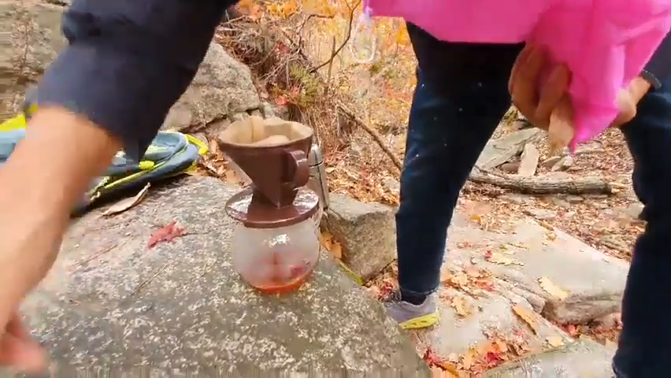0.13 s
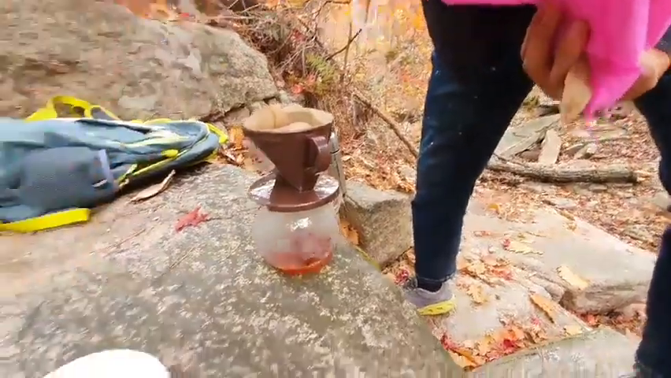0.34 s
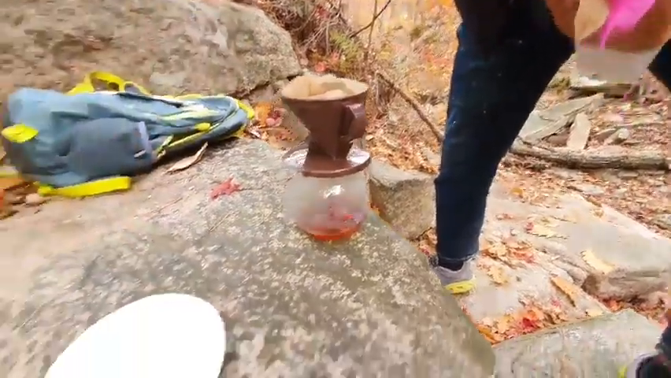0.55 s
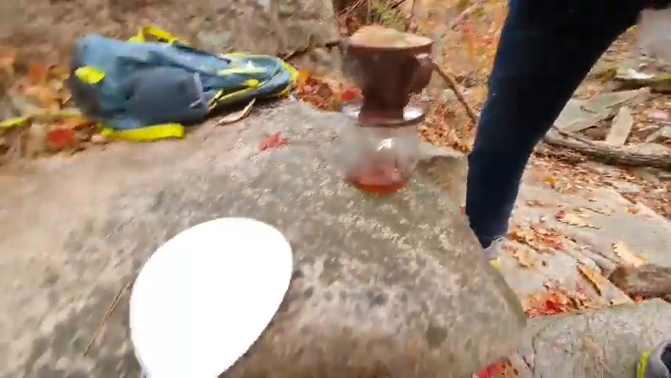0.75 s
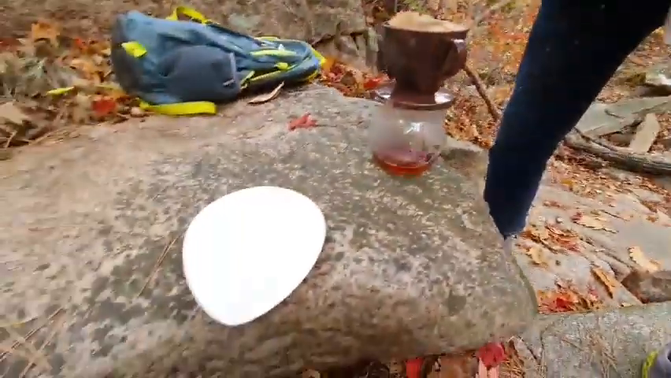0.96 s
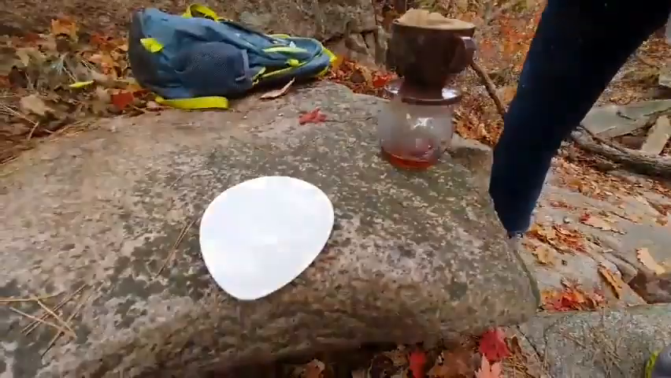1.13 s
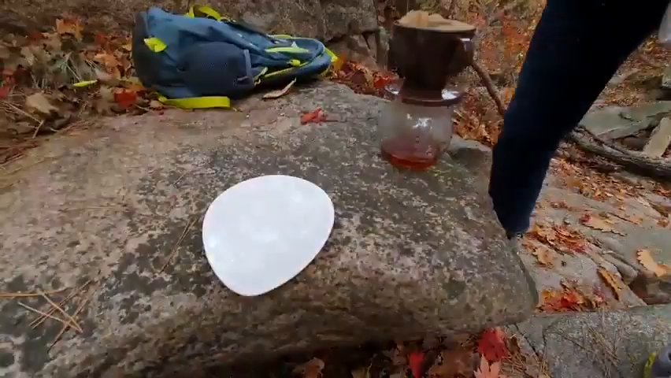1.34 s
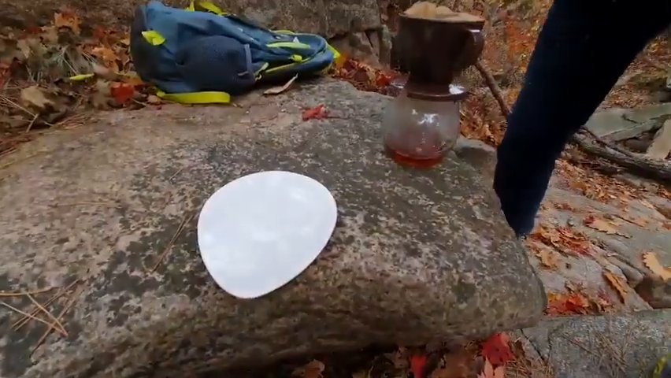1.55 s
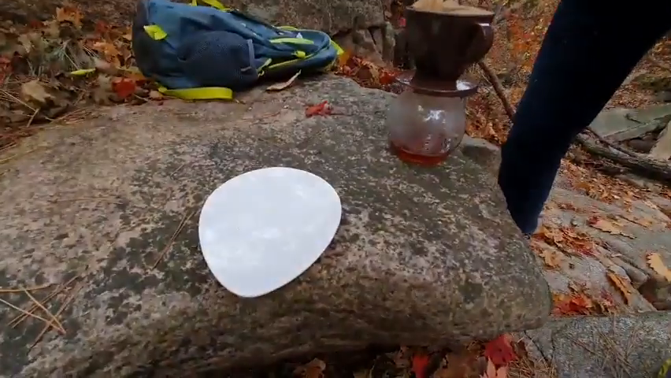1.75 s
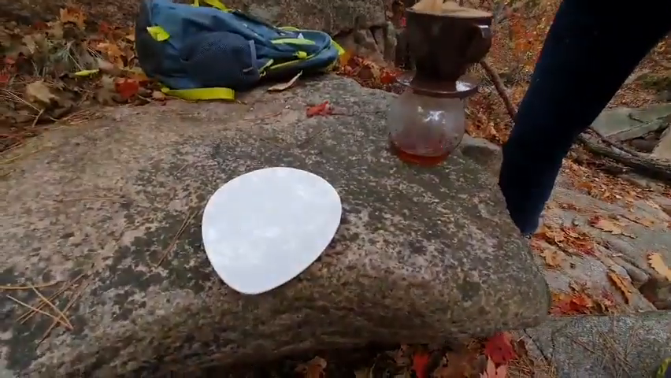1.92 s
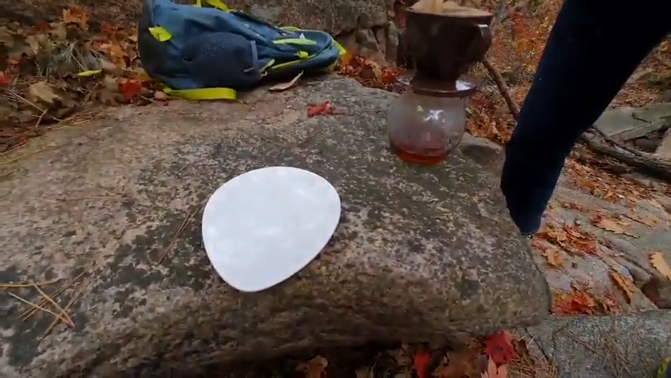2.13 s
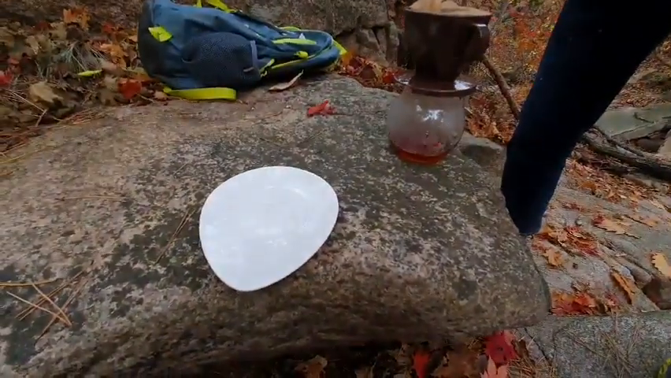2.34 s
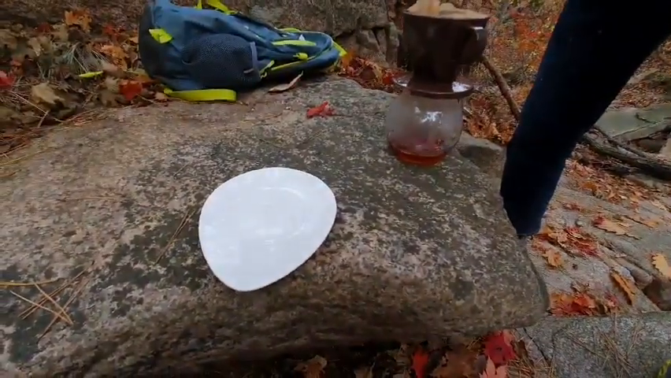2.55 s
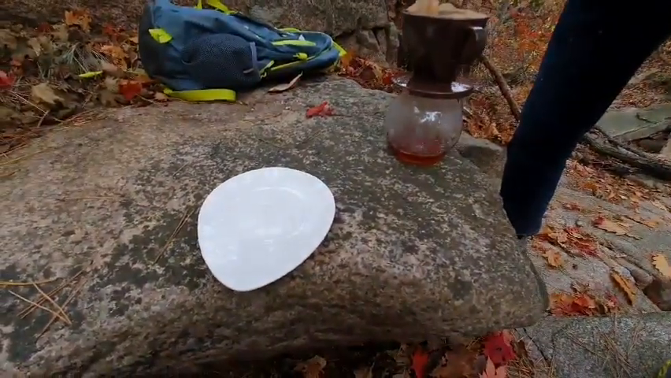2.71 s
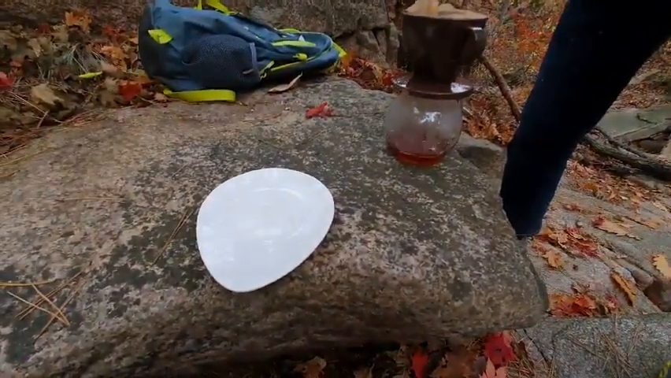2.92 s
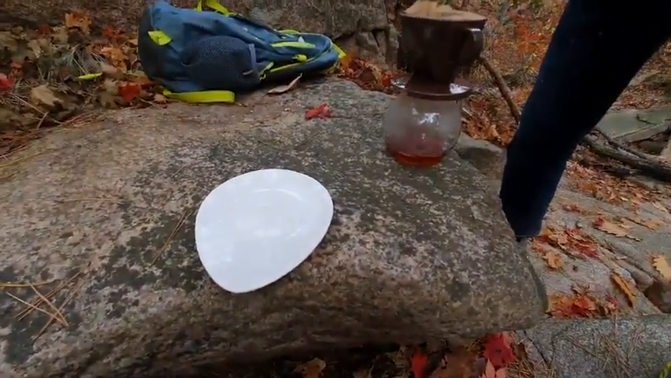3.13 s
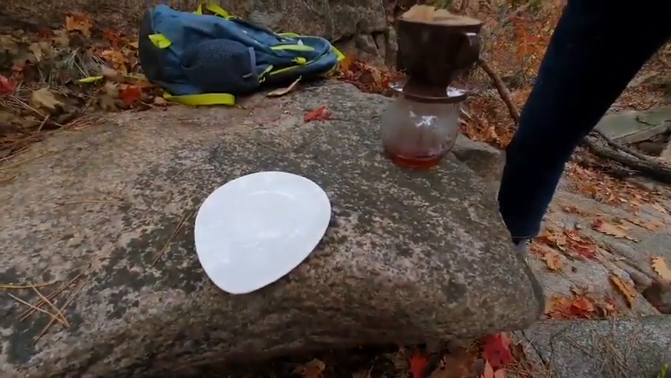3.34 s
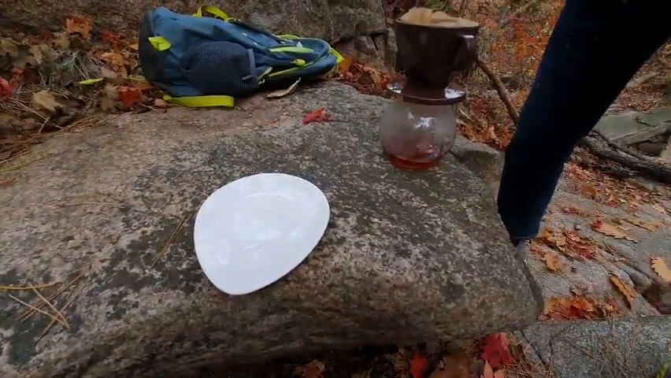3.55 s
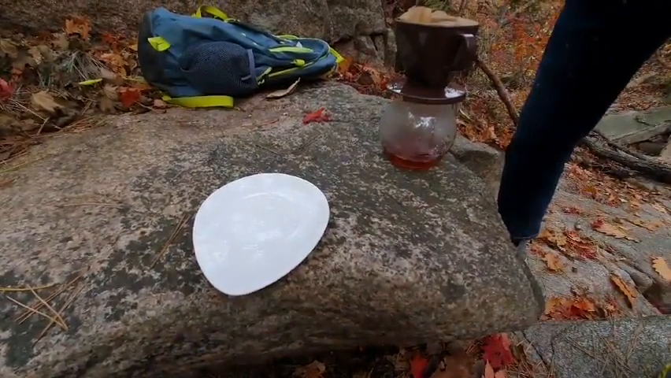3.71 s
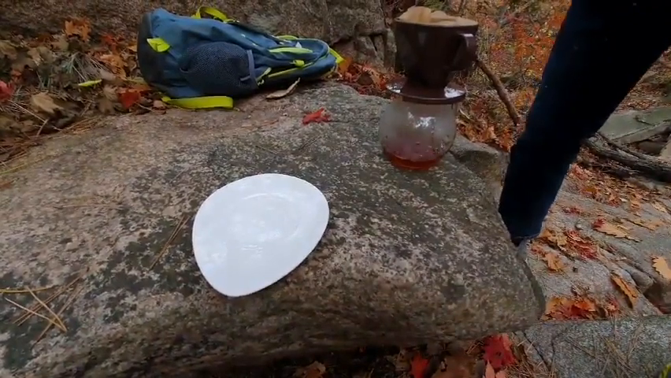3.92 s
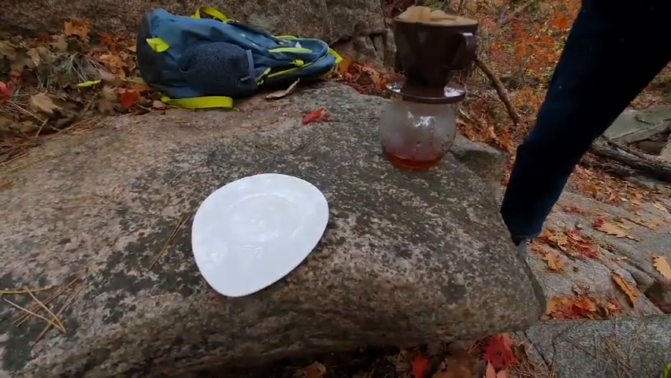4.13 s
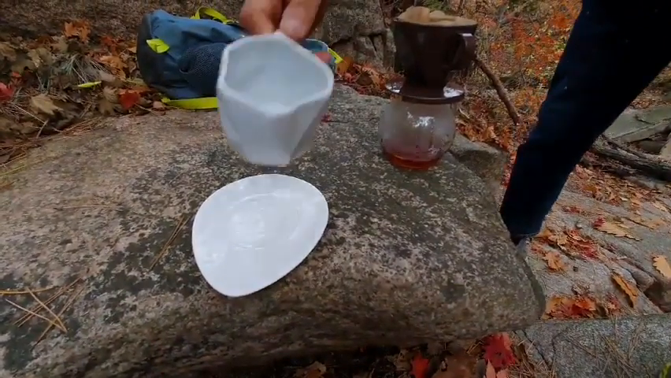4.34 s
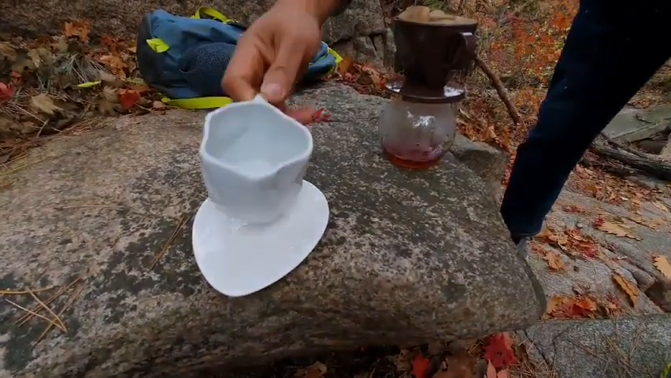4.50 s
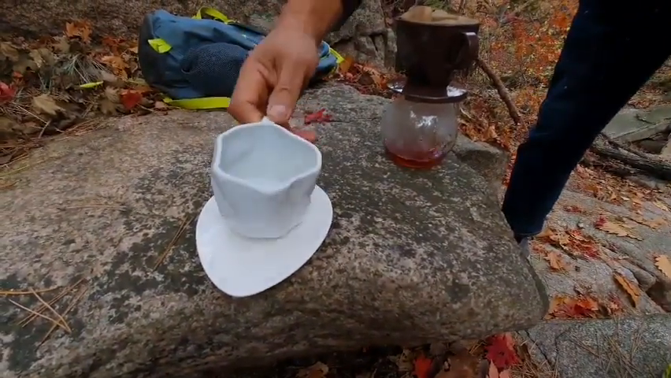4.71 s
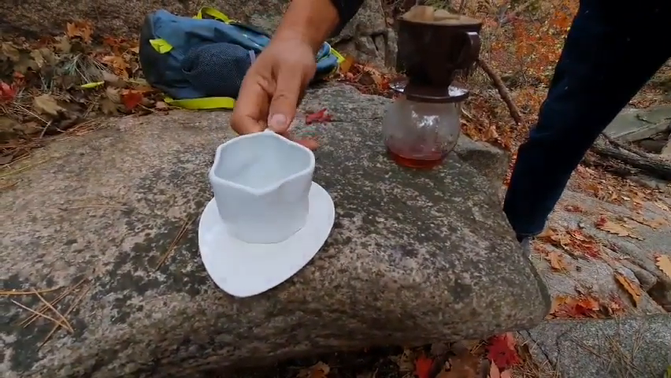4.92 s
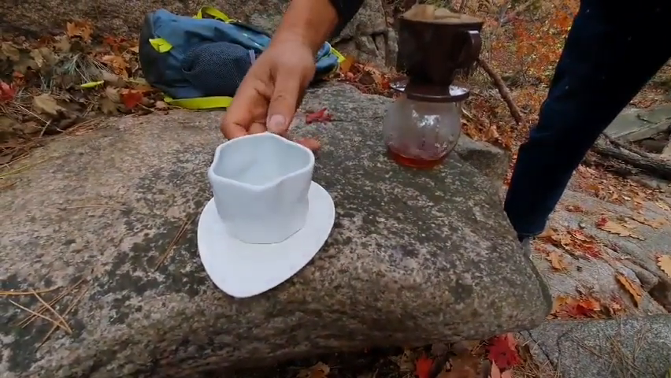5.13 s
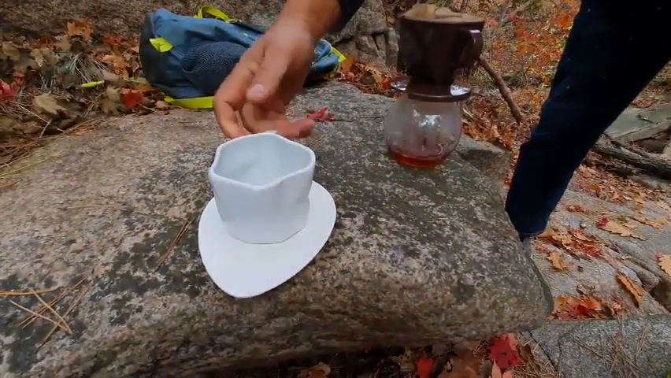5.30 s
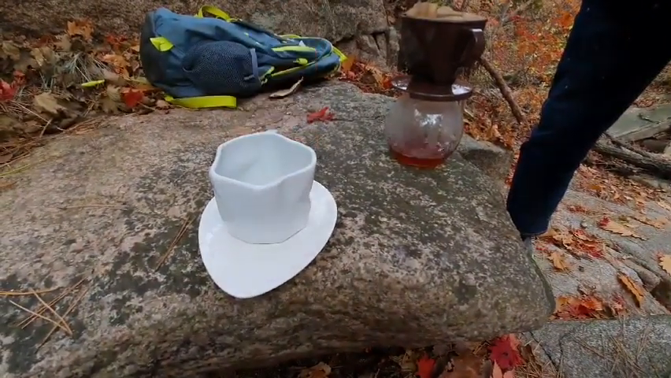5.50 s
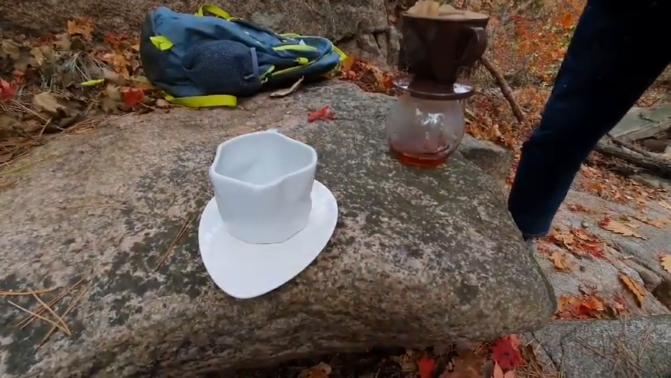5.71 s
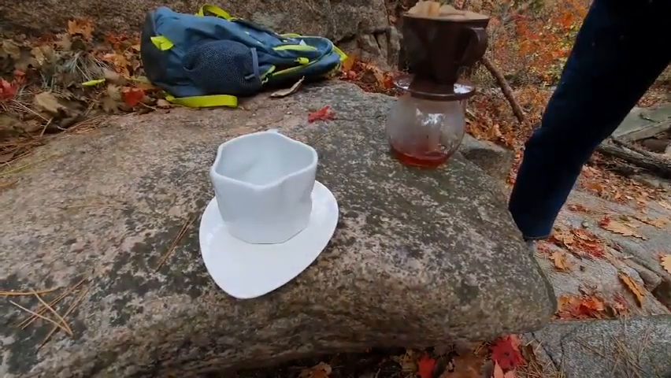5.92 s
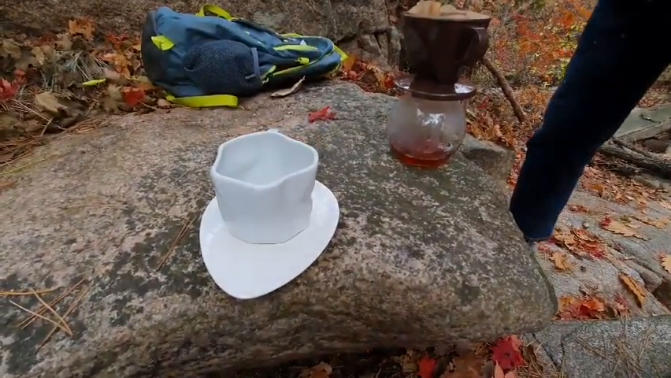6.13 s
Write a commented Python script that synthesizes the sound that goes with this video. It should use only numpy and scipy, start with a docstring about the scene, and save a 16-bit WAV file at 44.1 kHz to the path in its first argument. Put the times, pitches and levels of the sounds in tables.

```python
"""A porcelain saucer grinds to rest on a boulder in a quiet valley and rings out as the fingers let go.
A jacket sleeve swishes, porcelain is rubbed in short strokes close by, and then a cup is set on
the saucer: a gritty slide and a few clinks until its foot sits flat.
Porcelain is rough contact force driving decaying modes, plus coloured grit; cloth, snaps, valley air
and puffs at the microphone are shaped noise, with a faint falling zip in the cloth."""
import sys
import numpy as np
from scipy import signal
from scipy.fft import rfft, irfft
from scipy.io import wavfile

SR = 44100
rng = np.random.default_rng(int(sys.argv[2]) if len(sys.argv) > 2 else 0)


def inscribe(sig):
    """Save sig as 16-bit PCM at rate SR to the path in sys.argv[1].

    A 1-D sig is mono; a 2-D sig holds one channel per row.
    Samples are clipped to [-1, 1] before scaling.
    """
    pcm = np.round(np.clip(np.atleast_2d(sig).T, -1, 1) * 32767)
    wavfile.write(sys.argv[1], SR, pcm.astype(np.int16))


N = 276066
T = np.arange(N) / SR  # seconds


def from_db(db):
    """Amplitude gain of a level in dB."""
    return 10 ** (np.asarray(db) / 20)


def rms_one(x):
    """Scale to an rms of 1."""
    return x / np.sqrt(np.mean(x ** 2) + 1e-20)


def in_time(rows):
    """Each column of a curve, sample by sample."""
    s, *columns = np.transpose(rows)
    return [np.interp(T, s, column) for column in columns]


def at_hz(points, hz):
    """Read a spectrum on a log-frequency axis."""
    f, value = np.transpose(points)
    return np.interp(np.log(hz + 1), np.log(f), value)


def panned(pan_db):
    """Left and right gains of constant power; positive leans left."""
    return rms_one(from_db([[pan_db / 2], [-pan_db / 2]]))


def coloured(x, spectrum):
    """Causal (minimum-phase) filter of unit power gain, made by folding the cepstrum."""
    size = 4096
    gain = rms_one(from_db(at_hz(spectrum, np.fft.rfftfreq(size, 1 / SR))))
    cepstrum = irfft(np.log(gain))
    cepstrum[1:size // 2] *= 2
    cepstrum[size // 2 + 1:] = 0
    impulse = irfft(np.exp(rfft(cepstrum)))
    return signal.oaconvolve(np.atleast_2d(x), impulse[None], axes=1)[:, :N]


def grains(spread_db, per_s):
    """Noise of rms 1 whose strength varies from one asperity to the next."""
    sizes = from_db(spread_db * np.clip(rng.standard_normal(N), -2, 2))
    return rms_one(rng.standard_normal(N) * np.interp(T * per_s, np.arange(N), sizes))


# How alike the two microphone sides are. Each row: frequency in Hz, left-right likeness from -1 to 1.
LIKENESS = [(50, -0), (300, 0.7), (640, 0.4), (1400, -0.2), (3100, -0.4), (7000, -0.3), (15000, 0.3)]


def diffuse(spectrum, spread_db, per_s):
    """Grainy sound of rms 1 from all around; left-right likeness varies with frequency."""
    mid, side = rfft(grains(spread_db, per_s)), rfft(grains(spread_db, per_s))
    alike = np.clip(at_hz(LIKENESS, np.fft.rfftfreq(N, 1 / SR)), -1, 1)
    both_sides = np.sqrt(1 + alike) * mid + np.sqrt(1 - alike) * side * [[1], [-1]]
    return rms_one(coloured(irfft(both_sides, N), spectrum))


def stroke(s, swell, fade, hold=0):
    """Force that swells up to time s, holds, and dies away; all in seconds."""
    before, after = (s - T) / swell, np.maximum(T - s - hold, 0) / fade
    return np.exp(-np.minimum(np.where(T < s, before, after), 40))


def together(forces):
    """Unrelated forces add in power."""
    return np.sqrt(sum(force ** 2 for force in forces))


def contact(knocks):
    """Force of sudden knocks."""
    return together([from_db(db) * stroke(s, 1 / SR, fade) for s, db, fade in knocks])


def touch_forces(touches, bite_s, stop_s):
    """Each touch is a sudden knock and a short skid: two forces, one row per touch."""
    knocks = [from_db(db) * stroke(s, 1 / SR, fade) for s, db, fade, *_ in touches]
    skids = [from_db(db) * stroke(s, bite_s, stop_s, hold) for s, _, _, db, hold, *_ in touches]
    return np.array(knocks), np.array(skids)


def grinding(knock, skid, spread_db, per_s):
    """Sliding is grainy; each knock is one short even burst."""
    return skid * grains(spread_db, per_s) + knock * rng.standard_normal(N)


SKIRT_HZ = 490  # how far from its pitch a mode still radiates


def ring(force, modes):
    """Modes store a rough force's energy; grit scatters their phase, and they ring clean once left alone."""
    touching = np.flatnonzero(force > 1e-5)
    live = slice(touching[0], min(N, touching[-1] + SR // 2))
    t, push, out = T[live] - T[live][0], force[live], np.zeros((2, N))
    # running mean over about 8.5 ms; its scale cancels in the ratio below
    mean = lambda v: signal.lfilter([1], [1, -np.exp(-1 / (0.0085 * SR))], v) + 1e-24
    skirt = signal.butter(2, SKIRT_HZ, fs=SR, output="sos")
    for hz, db, t60, pan_db, *flat_hz in modes:
        r = from_db(-60 / (t60 * SR))  # decay per sample
        scatter = rng.standard_normal((2, N))[:, live].T @ [1, 1j]
        swing = signal.lfilter([1], [1, -r], push * scatter)
        energy = signal.lfilter([1 - r * r], [1, -r * r], push ** 2)
        swing = swing * np.sqrt(2 * mean(energy) / mean(abs(swing) ** 2))
        swing = signal.sosfilt(skirt, swing)  # still centred on 0 Hz here
        pitch = hz - sum(flat_hz) * np.exp(-t / 0.078)  # the fingers' load lifts off
        carrier = np.exp(2j * np.pi * np.cumsum(pitch) / SR)
        out[:, live] += panned(pan_db) * from_db(db) * (swing * carrier).real
    return out


def placed(x, lag_ms, scatter_db):
    """The right side hears it a little later; the rock scatters a short tail."""
    direct = np.array([x[0], np.interp(T - lag_ms / 1000, T, x[1])])
    t = T[:SR // 8]
    tail = rng.standard_normal((2, len(t))) * np.exp(-t / 0.0055) * (t > .001)
    tail /= np.sqrt(np.sum(tail ** 2, axis=1, keepdims=True))
    return direct + from_db(scatter_db) * signal.oaconvolve(x, tail, axes=1)[:, :N]


# The saucer bumps the rock and skids on. Each row: start in seconds, knock in relative dB,
# knock die-away in seconds, friction in relative dB, skid in seconds.
SAUCER_TOUCHES = [(.0005, -7, .002, -16.5, 0.0026), (.0144, -8.5, 0.001, -30, 0.0057),
                  (.0205, -21, 0.0011, -28.5, 0.0074), (.034, -17.5, 0.0025, -25, 0.012),
                  (.05, -15.5, 0.00088, -38, 0.0054), (.071, -35, .002, -29.5, 0.0022),
                  (.118, -58, 0.0017, -52, 0.019)]
# Ringing of the plate. Each row: frequency in Hz, relative level in dB, time to fall 60 dB in seconds,
# left over right in dB, flattening at first touch in Hz.
SAUCER_MODES = [(432, -32.5, 0.21, 5, 0), (1518, -8, .06, 7, 1), (2025, 2.5, 0.31, -1.5, 125.5),
                (2364, 2.5, 0.31, -6, 48), (3176, -14, 0.07, -2, 0.5), (3905, -0.5, 0.081, -11, 32),
                (4411, 3, .15, -7, 58), (5400, -17.5, .12, 8, 0.5), (6320, -30, 0.14, 3, 0),
                (6806, -29, 0.126, 5, 0), (8500, -31, .12, 1, 0), (9060, -37.5, .12, 1.5, 1),
                (12220, -32, .15, -13, -0.5), (12670, -32.5, .12, -18, -1)]
# Grit of porcelain on rock. Each row: frequency in Hz, relative level per Hz in dB.
SAUCER_GRIT = [(100, -34), (500, -19), (1100, -8), (1450, 4.5), (2600, -1.5), (3800, -1.5), (4400, 3.5),
               (4950, -20), (5500, -14), (6500, -24.5), (7500, -57), (16000, -57.5)]
SAUCER_BITE_S, SAUCER_STOP_S = 0.0033, 0.0072  # friction builds up, and dies after a skid


def saucer():
    """The saucer's foot grates over the rock, then the plate rings out."""
    knock, skid = map(together, touch_forces(SAUCER_TOUCHES, SAUCER_BITE_S, SAUCER_STOP_S))
    grit = coloured(grinding(knock, skid, spread_db=2.25, per_s=1500), SAUCER_GRIT)
    tone = ring(together([knock, skid]), SAUCER_MODES)
    mix = from_db(-2.5) * panned(-1.9) * grit + from_db(0.5) * tone
    return placed(mix, lag_ms=.3, scatter_db=-19.5)


# Steady rustle of the jacket, rising and settling with the arm's movement.
# Each row: time in seconds, relative level in dB.
RUSTLE = [(0, -53), (.2, -62.5), (.36, -52), (1.06, -43), (1.3, -55), (1.9, -52), (2.16, -59.5),
          (3.3, -61.5), (3.55, -72), (5.2, -78), (6.26, -74.5)]
# Single sweeps of the sleeve. Each row: time of peak in seconds, swish in relative dB,
# hiss in relative dB, swell in seconds, die-away in seconds.
SWEEPS = [(.96, -44, -57, 0.015, 0.054), (1.049, -38.5, -44, 0.012, .02),
          (1.117, -38.5, -34.5, 0.034, 0.033), (1.215, -68, -31, 0.04, 0.038),
          (1.35, -52, -46, 0.031, .035), (1.5, -44, -49.5, 0.022, 0.061), (1.6, -47.5, -53, 0.039, 0.057),
          (1.759, -45.5, -47.5, 0.037, 0.097), (1.87, -45, -45, 0.091, 0.14),
          (2.02, -51, -48, 0.025, 0.023), (2.42, -55.5, -60, 0.048, 0.052),
          (2.88, -50.5, -58.5, .05, 0.041), (3.255, -55, -58.5, 0.029, .02), (3.38, -64, -72, .03, .04),
          (4.15, -70.5, -72, .12, .14), (4.68, -71, -75.5, .12, .08)]
HISS_AT_DB = -50
HISS_DB, HISS_GROWTH = -52, 1.5  # relative hiss at a rustle of HISS_AT_DB; dB of hiss per dB of rustle


def sleeve_levels():
    """Strength of swish and hiss: a steady rustle, brighter as it grows, with single sweeps on top."""
    rustle_db, = in_time(RUSTLE)
    swish = from_db(rustle_db) ** 2
    hiss = from_db(HISS_DB + HISS_GROWTH * (rustle_db - HISS_AT_DB)) ** 2
    for s, swish_db, hiss_db, swell, fade in SWEEPS:
        power = stroke(s, swell, fade) ** 2
        swish = swish + from_db(swish_db) ** 2 * power
        hiss = hiss + from_db(hiss_db) ** 2 * power
    return np.sqrt(swish), np.sqrt(hiss)


def crumple(spread_db, per_s):
    """Folds give way here and there: each half-octave has small scuffs of its own."""
    out, edges = 0, np.geomspace(250, 15500, 13)  # Hz
    for low, high in zip(edges, edges[1:]):
        band = signal.butter(2, [low, high], "band", fs=SR, output="sos")
        steps = from_db(spread_db * np.clip(rng.standard_normal(4000), -2, 2.3))
        strength = np.interp(T * per_s, np.arange(len(steps)), steps)
        out = out + signal.sosfilt(band, rng.standard_normal((2, N)) * strength)
    return out


# Body of the cloth's swish. Each row: frequency in Hz, relative level in dB.
SWISH = [(88, -43), (150, -9.5), (652, -5), (899, -8.5), (1260, -6.5), (1520, -7), (1920, -3.5),
         (3710, -4.5), (4250, -3.5), (4710, -5.5), (8500, -16.5), (11000, -48.5), (18700, -120)]
# Its airy treble. Each row: frequency in Hz, relative level in dB.
HISS = [(4120, -34), (7000, -4.5), (8190, -19.5), (9210, -4.5), (10100, -1.5), (12500, 1.5), (14900, -8.5),
        (15600, -2.5)]
# A faint falling zip of cloth. Each row: time in seconds, frequency in Hz, level in dB.
ZIP = [(0.648, 615.7, -56.5), (0.731, 591.3, -53.5), (0.766, 535, -41), (.8, 439, -50), (0.849, 262, -54.5),
       (0.911, 101, -56.5), (.95, 78.6, -90)]


def jacket():
    """Cloth slides on cloth and crumples; its weave zips down in pitch as the arm slows."""
    swish_level, hiss_level = sleeve_levels()
    scuffs = crumple(spread_db=5, per_s=110)
    swish = from_db(-4) * diffuse(SWISH, 3, 500) + from_db(-2) * rms_one(coloured(scuffs, SWISH))
    hiss = from_db(-2) * diffuse(HISS, 2.8, 900) + from_db(-6.0) * rms_one(coloured(scuffs, HISS))
    zip_hz, zip_db = in_time(ZIP)
    rough_hz = zip_hz * (1 + 1.0 * rng.standard_normal(N))
    sounding = (T > ZIP[0][0]) * (T < ZIP[-1][0])
    weave = np.sin(2 * np.pi * np.cumsum(rough_hz) / SR) * sounding
    cloth = panned(-3.5) * swish_level * swish + panned(.3) * hiss_level * hiss
    return cloth + panned(-0.68) * from_db(zip_db) * weave


# Soft low puffs and swells at the microphone. Each row: time of peak in seconds, level in dB,
# centre in Hz, swell in seconds, die-away in seconds, left over right in dB.
PUFFS = [(.01, -58.5, 130, .01, .04, 6.5), (.89, -68, 110, .025, .03, 3), (1.975, -50, 70, .018, .018, -2),
         (2.7, -62.5, 300, .7, 0.41, -0.5), (3.16, -50.5, 130, .015, .03, 5),
         (3.27, -60.5, 277, 0.078, 0.119, 7.5), (3.335, -44.5, 55, .03, .03, 6.5),
         (3.68, -52, 127, 0.12, .09, 10), (4.76, -56.5, 100, 0.096, .04, 3), (5.58, -60, 90, .03, .03, 1),
         (5.83, -53.5, 75, 0.013, .025, -6.5), (6.13, -59, 100, .03, .05, 5.5)]


def puffs():
    """Each puff is a swell of low noise about an octave wide."""
    out, air = 0, rng.standard_normal(N) + .9 * rng.standard_normal((2, N))
    for s, db, hz, swell, fade, pan_db in PUFFS:
        band = signal.butter(2, [hz / np.sqrt(2), hz * np.sqrt(2)], "band", fs=SR, output="sos")
        puff = stroke(s, swell, fade) * rms_one(signal.sosfilt(band, air))
        out = out + from_db(db) * panned(pan_db) * puff
    return out


# Low breeze on the microphone. Each row: frequency in Hz, relative level in dB.
RUMBLE_COLOUR = [(15, -22), (30, 4), (60, 2.5), (130, -3), (190, -13.5), (300, -12.5), (450, -30),
                 (900, -61)]
# Still air of the valley. Each row: frequency in Hz, relative level in dB.
VALLEY = [(15, -40.5), (25, -14.5), (126, -11), (174, -20.5), (253, -8), (323, -21), (359, -17),
          (510, -19.5), (583, -23), (805, -28), (947, -32), (1670, -22), (7730, -49.5), (12200, -29),
          (15600, -46)]
BREEZE_DB, VALLEY_DB = -65.5, -67.5  # rms levels


def valley():
    """Still outdoor air, with a light breeze on the microphone, as steady grainy noise plus puffs."""
    breeze = from_db(BREEZE_DB) * panned(2.5) * diffuse(RUMBLE_COLOUR, 3, 50)
    return breeze + puffs() + from_db(VALLEY_DB) * diffuse(VALLEY, 0.9, 200)


# Small snaps of cloth, leaves and twigs. Each row: start in seconds, level in dB, pitch in Hz,
# die-away in seconds, left over right in dB.
SNAPS = [(0.665, -39.5, 2530, 0.0037, -6), (.784, -40, 3000, 0.0063, -4), (.814, -34.5, 2760, 0.017, -4),
         (.836, -30.5, 2560, 0.0072, -5.5), (0.958, -33, 3020, 0.039, -4), (1.111, -26.5, 3130, 0.0055, -4),
         (1.125, -34, 2050, 0.0066, -1), (1.74, -45, 900, 0.0021, -5), (1.8, -33.5, 1420, 0.0023, 8),
         (1.8325, -31, 3280, 0.00091, -16), (1.841, -26.5, 11200, 0.00055, -23),
         (1.858, -46, 8100, 0.00042, -14), (1.882, -37, 6030, 0.00061, -8), (1.914, -36, 840, 0.012, -4),
         (1.936, -41, 665, 0.0087, -21), (1.959, -39.5, 664, 0.0088, -17), (2.109, -51, 1390, 0.011, -17),
         (2.194, -62, 1190, 0.0023, -1.5), (2.909, -39.5, 3690, 0.0033, -3),
         (3.324, -56, 4000, 0.0034, -11), (3.842, -50.5, 346, 0.0073, 11), (4.336, -52, 700, 0.005, -6),
         (4.411, -46, 1500, 0.0023, 23), (4.539, -58, 1490, .003, -10.5), (5.519, -52.5, 1570, .003, -20),
         (5.764, -56, 2500, .003, -3.5), (5.819, -56, 800, 0.0016, -17), (5.821, -45, 199, .003, -15)]


def snaps():
    """Each snap is a brief burst in one broad band."""
    out, t = np.zeros((2, N)), T[:SR // 4]
    for s, db, hz, fade, pan_db in SNAPS:
        low, high = hz / 1.7, min(hz * 1.6, .45 * SR)
        band = signal.butter(2, [low, high], "band", fs=SR, output="sos")
        # noise partly shared by both sides
        noise = rms_one(rng.standard_normal(len(t)) + 2.7 * rng.standard_normal((2, len(t))))
        burst = signal.sosfilt(band, noise * np.exp(-t / fade))
        burst = burst * np.sqrt(SR / 2 / (high - low))  # makes up for the narrow band
        at = round(s * SR)
        out[:, at:at + len(t)] += from_db(db) * panned(pan_db) * burst
    return out


# Porcelain rubbed close by. Each row: time of peak in seconds, friction in relative dB, swell in seconds,
# die-away in seconds, treble of the grit in relative dB, frequency it rings most at in Hz,
# ring in relative dB, fall of the other modes in dB per octave.
RUBS = [(1.191, -30.5, .0015, 0.038, -5, 6710, 5, 21), (1.212, -39.5, 0.0055, 0.021, 19, 6620, -0.5, 24),
        (1.315, -45.5, 0.004, 0.062, -12, 5700, 5.5, 32), (1.45, -39, .002, 0.017, 1, 5700, 2.5, 27),
        (2.271, -42.5, 0.0045, 0.028, 4.5, 11490, 0, 4.5), (2.48, -44, 0.0097, 0.028, 7, 6950, -7, 3),
        (2.603, -49, 0.0097, 0.022, 7, 11400, -3, 4.5), (2.718, -43, 0.014, 0.03, 1, 3780, 3, 12.5),
        (2.843, -37, 0.018, 0.028, -10, 4010, -2, 8.5), (3.0, -43, 0.0037, 0.013, -7, 4210, -3.5, 10),
        (3.078, -42.5, 0.019, 0.012, -19, 4580, -5.5, 9.5),
        (3.137, -32, 0.003, 0.013, -17, 4740, -7.5, 8.5)]
# Ringing under the strokes. Each row: frequency in Hz, relative level in dB,
# time to fall 60 dB in seconds, left over right in dB.
RUB_MODES = [(1015, -5, 0.126, -7), (1720, -8, 0.25, 7), (2340, -2, 0.152, 14), (2670, -6, 0.17, 5),
             (3670, -15, 0.2, -4), (4032, 1, 0.13, -26), (4764, -4, 0.22, -18), (5390, -1.5, 0.082, -9),
             (7814, -7, 0.055, 6), (8610, -13.5, 0.12, 8), (9940, -2, 0.11, -16), (10900, -12, .1, 11),
             (12400, -7, 0.09, 18), (13780, -3, 0.08, 15), (15400, -18.5, .08, -1.5)]
# Grit of the strokes. Each row: frequency in Hz, relative level in dB.
RUB_GRIT = [(200, -39.5), (750, -2.5), (1000, -11), (1600, 2), (2500, 0), (4300, 2.5), (5600, 4.5),
            (8000, -18.5), (12000, -6.5), (15500, -19)]


def rubbing():
    """Short dry strokes over glaze; each favours the modes near one pitch, by where it touches."""
    s, db, swell, fade, treble_db, ring_hz, ring_db, fall_db = np.transpose(RUBS)
    strokes = np.array([from_db(level) * stroke(*shape) for level, *shape in zip(db, s, swell, fade)])
    low_pass = signal.butter(2, 7000, fs=SR, output="sos")
    high_pass = signal.butter(2, 7500, "high", fs=SR, output="sos")
    low = signal.sosfilt(low_pass, diffuse(RUB_GRIT, 1.2, 630))
    high = signal.sosfilt(high_pass, diffuse(RUB_GRIT, 3.8, 2200))
    grit = panned(-2.0) * strokes.sum(0) * low + panned(0.62) * (from_db(treble_db) @ strokes) * high

    def favour(hz):
        """How strongly each stroke drives a mode, with 2 dB of chance."""
        octaves_off = abs(np.log2(hz / ring_hz))
        return from_db(ring_db - fall_db * octaves_off + rng.normal(0, 2, len(s)))

    tone = sum(ring(favour(mode[0]) @ strokes, [mode]) for mode in RUB_MODES)
    return from_db(-1.5) * grit + from_db(-2.0) * tone


# The cup knocks on the saucer and skids on. Each row: start in seconds, knock in relative dB,
# knock die-away in seconds, friction in relative dB, skid in seconds, how freely it rings in dB,
# left over right of the grit in dB.
CUP_TOUCHES = [(4.75, -12, 0.00081, -25, 0.019, 2.5, 1.5), (4.773, -22, 0.0021, -26.5, .005, 6.5, -7),
               (4.7825, -18, 0.0035, -28, .026, -4, -14), (4.842, -23, 0.0019, -30, 0.0042, -16, -8),
               (4.8979, -20, 0.00358, -28, .008, -20.5, -11), (4.91, -35, 0.0022, -29, 0.011, -13, -8.5),
               (4.95, -22.5, 0.0033, -22.5, .004, -12, -12.5),
               (4.959, -20, 0.00082, -34, .005, -2.5, -16.5), (4.969, -31, 0.0018, -32.5, 0.0036, -4, -3),
               (4.9986, -24, 0.0034, -38, 0.02, -18, -10)]
# Ringing of the cup. Each row: frequency in Hz, relative level in dB, time to fall 60 dB in seconds,
# left over right in dB.
CUP_MODES = [(1665, -10.5, 0.0696, -13.5), (1957, 2, 0.11, -9.5), (2070, -6, .15, -10.5),
             (2223, -11, .18, -16), (2365, -12, 0.46, -12.5), (2654, -18, 0.46, -14.5),
             (3267, -7, 0.055, -11.5), (3907, 5, 0.14, -12), (3955, -1, 0.13, -19),
             (4333, -4.5, 0.084, -16), (5560, -23, .07, -9), (6450, -32.5, 0.28, -9.5),
             (7800, -38.5, .11, -9.5), (8250, -46, 0.079, -6), (8970, -35, .11, -13.5),
             (12010, -30, 0.12, -7), (12140, -26.5, .13, -11), (13780, -34.5, .09, -19.5),
             (14350, -31.5, 0.089, -16.5)]
# Grit of the foot on glaze. Each row: frequency in Hz, relative level in dB.
CUP_GRIT = [(100, -43), (300, -23.5), (550, -11), (1000, -1), (1600, 8.5), (2300, 11.5), (2850, 4.5),
            (3600, 2), (4300, -8), (4900, -29.5), (6000, -26.5), (7000, -38.5), (15000, -51.5)]
# The last clink, as the foot drops flat. Each row: start in seconds, force in relative dB,
# die-away in seconds.
SEATING = [(5.0003, -8, 0.001)]
# Cup and saucer ringing together. Each row: frequency in Hz, relative level in dB,
# time to fall 60 dB in seconds, left over right in dB.
SEATED_MODES = [(1656, 0.5, 0.058, -11), (1910, -8.5, 0.045, -9), (3946, 0.5, 0.089, -19.5)]
CUP_BITE_S, CUP_STOP_S = .004, 0.015  # friction builds up, and dies after a skid


def cup():
    """The cup lands on one edge, slides, rocks and drops flat; fingers and saucer damp some touches more."""
    knocks, skids = touch_forces(CUP_TOUCHES, CUP_BITE_S, CUP_STOP_S)
    *_, free_db, pan_db = np.transpose(CUP_TOUCHES)
    sides = np.hstack([panned(p) for p in pan_db]) ** 2  # power of each touch, left and right
    knock, skid = np.sqrt(sides @ knocks ** 2), np.sqrt(sides @ skids ** 2)
    grit = from_db(-0.5) * coloured(grinding(knock, skid, spread_db=3.7, per_s=1200), CUP_GRIT)
    ringing_force = np.sqrt(from_db(free_db) ** 2 @ (knocks ** 2 + skids ** 2))
    tone = ring(ringing_force, CUP_MODES)
    last_clink = ring(contact(SEATING), SEATED_MODES)
    return placed(grit + tone + last_clink, lag_ms=0.15, scatter_db=-13.5)


def scene():
    """All the sounds of the valley, added up."""
    return saucer() + jacket() + valley() + snaps() + rubbing() + cup()


CUTOFF_HZ = 15750


def record(dry):
    """The top is cut steeply."""
    return signal.sosfilt(signal.ellip(12, .1, 80, CUTOFF_HZ, fs=SR, output="sos"), dry)


dry = scene()
out = record(dry)
inscribe(out)
```